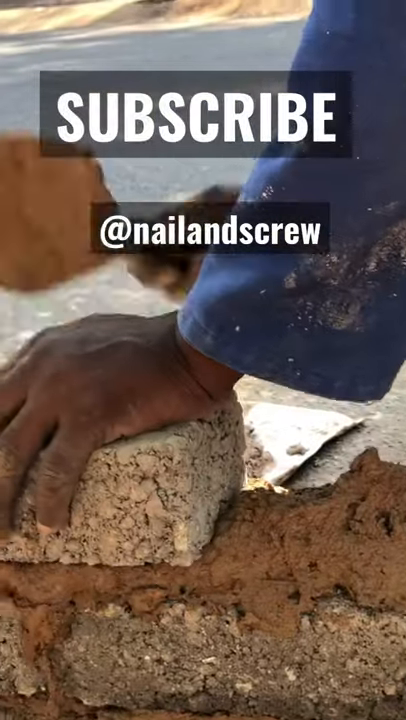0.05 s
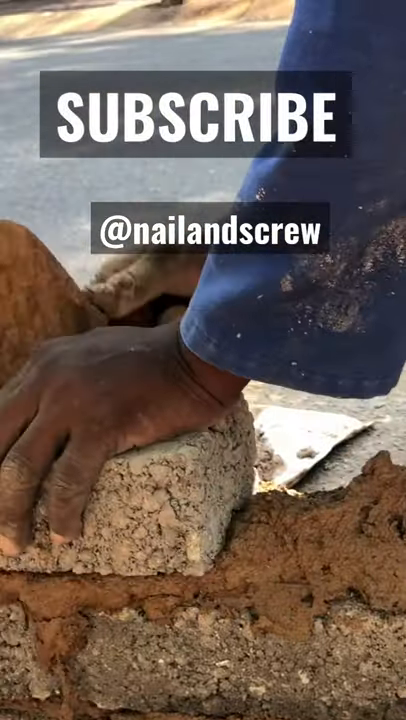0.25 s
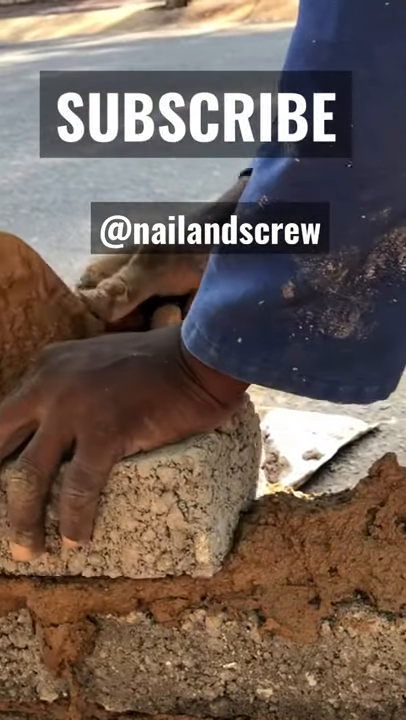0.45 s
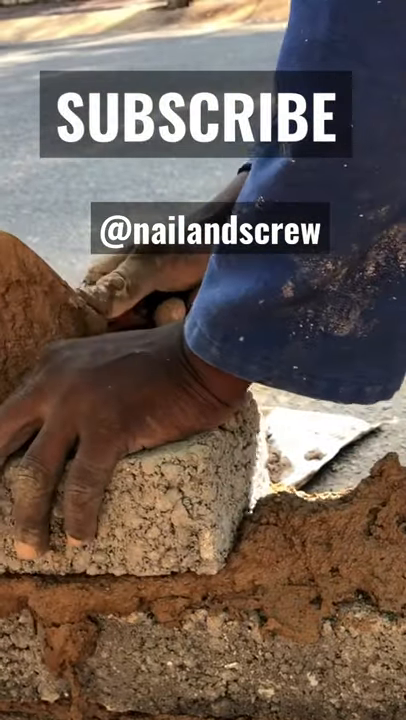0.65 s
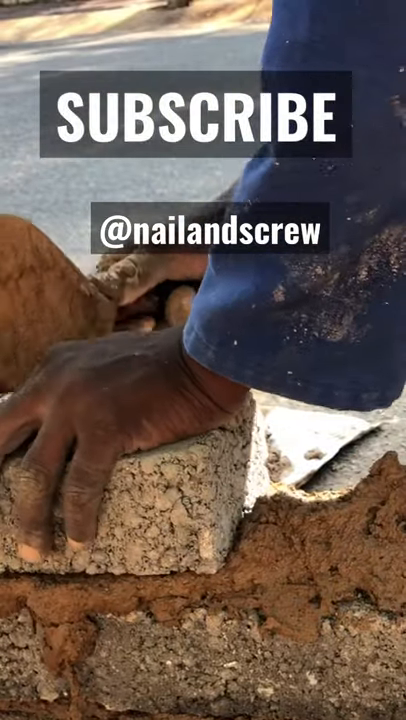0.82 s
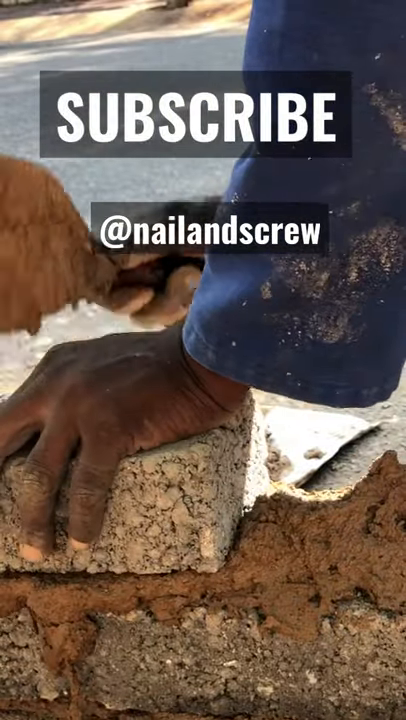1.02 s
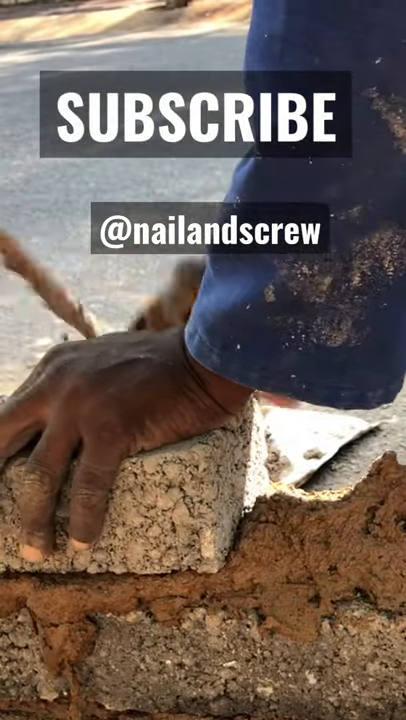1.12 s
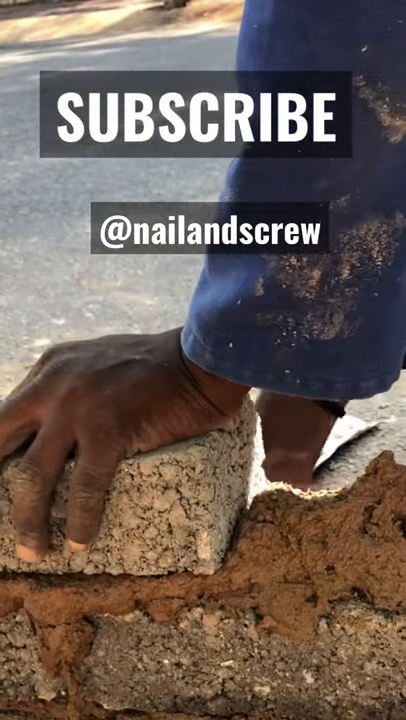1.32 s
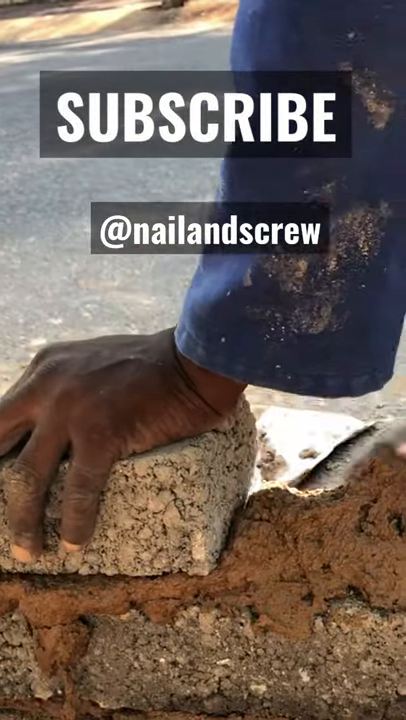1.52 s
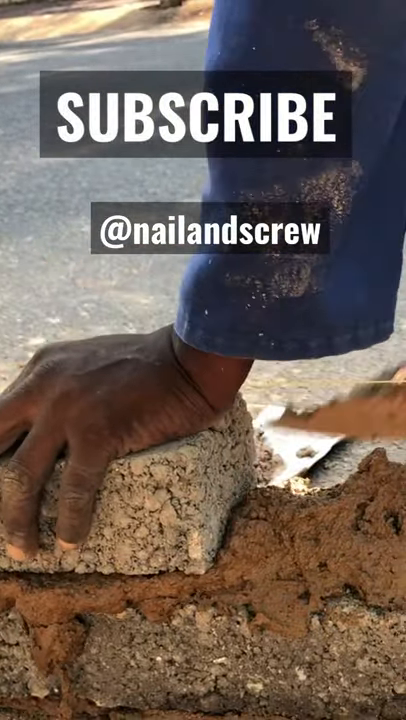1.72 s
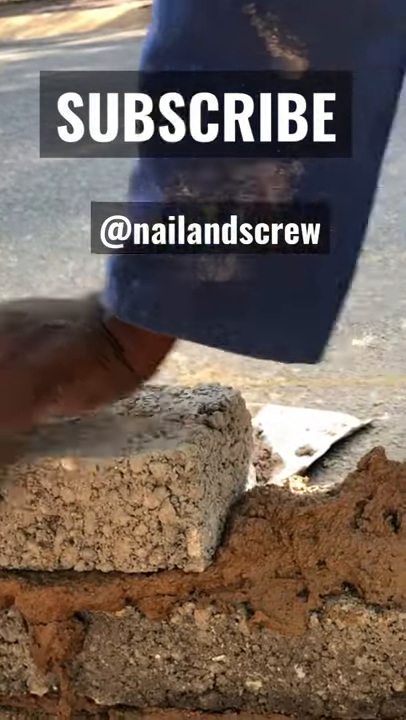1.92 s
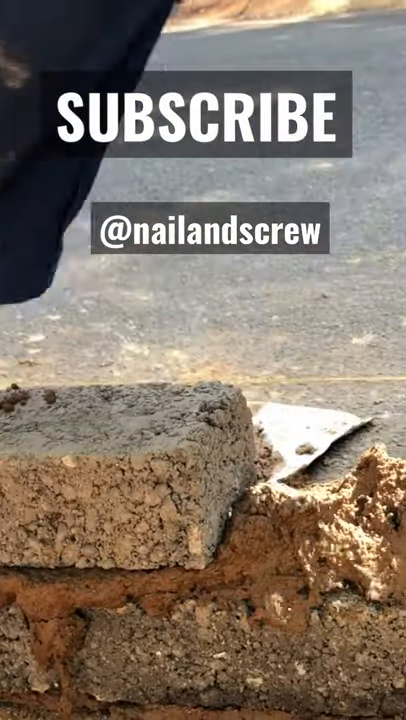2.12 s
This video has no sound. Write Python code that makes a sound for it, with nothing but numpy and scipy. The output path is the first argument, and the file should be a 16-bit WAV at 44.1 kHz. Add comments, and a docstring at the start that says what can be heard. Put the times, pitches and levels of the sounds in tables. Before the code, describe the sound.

Close by, a hand tool knocks a brick into mortar five times, each blow sharp and slightly gritty. A steel trowel then scrapes briefly over sandy ground, with quiet street air and a low distant hum behind.

```python
"""Outdoors, over quiet street air and a low hum, probably a distant engine, sand rustles faintly.
Close by, a mason knocks a brick into its mortar bed five times with a hand tool: each blow crushes
sand, sounds the damped brick, rings the tool and thuds through the wall.
Then steel lands on gritty ground and scrapes along it for a quarter of a second, the grit hissing
and ringing the blade. The hum, louder by now, carries on to the end."""
import sys
import numpy as np
from scipy import signal
from scipy.fft import rfft, irfft
from scipy.io import wavfile
from scipy.ndimage import uniform_filter1d, map_coordinates

SR = 44100
rng = np.random.default_rng(int(sys.argv[2]) if len(sys.argv) > 2 else 0)


def master(y):
    """Save y as 16-bit WAV."""
    cut = np.clip(np.atleast_2d(y).T, -1, 1)
    pcm = np.round(cut * 32767)  # scale
    wavfile.write(sys.argv[1], SR, pcm.astype(np.int16))


N = 94815
TIME = np.arange(N) / SR
HIT = np.arange(SR // 3) / SR  # time within a one-shot [s]

# Blows on the brick (time [s], level [dB], pitch [ratio], then trims: crunch [dB], thud [dB],
# tool ring [dB], brick mids [dB], brick treble [dB])
KNOCKS = [(0.2335, 0.5, 0.98, -1, -0.5, -5, -10, 2), (0.4348, 0.5, .97, 1, -1, 3, -6, 0),
          (0.632, -2, .99, -3, 3, -2, -8, -1.5), (0.7635, -8.5, 1.022, -3, -2.5, -2.5, 0, -0.5),
          (.9170, -3.5, 0.99, -1.5, -7, 1.5, -2, 0.5)]
# The tool touches the brick again (time [s], level [dB], pitch [ratio], crunch [dB], clink [dB])
REBOUNDS = [(0.246, -25.5, 1, 2, 0), (0.2561, -30.5, 0.89, 16.5, 21.5), (.4388, -18, 1.0, -8, -0.5),
            (.4745, -42.5, 1.5, 19, 16), (.7676, -14.5, 1.02, 7, -14), (.7715, -15, 1.02, -16, -10)]
# Heavily damped modes of the bedded brick (frequency [Hz], level [dB], t60 [s])
BRICK_MODES = [(362, -15, 0.029), (655, -7, 0.023), (969, -1.5, 0.017), (1055, -3, 0.015),
               (1266, -16, 0.0053), (1565, -24, 0.0105), (2063, -19, 0.029), (2388, -21, 0.023),
               (3620, -26.5, 0.028), (4930, -34, 0.013)]
# Longer ring of the tool (frequency [Hz], level [dB], t60 [s])
TOOL_MODES = [(460.5, -10, 0.14), (576, -12, 0.099), (806, -13, 0.11), (953, -24, 0.051),
              (1170, -1.5, 0.084), (1249, -0.5, 0.11), (1255, -18.5, 0.3), (1813, -9, 0.086),
              (1985, -35, 0.046), (2470, -11.5, 0.088), (3180, -26.5, 0.096), (3670, -30, 0.081),
              (4690, -43, .1)]
# Thud of the wall under the mortar bed (frequency [Hz], level [dB], t60 [s])
WALL_MODES = [(219.4, 3, 0.095), (333, -3.5, 0.063)]
# Low end of the brick sinking into the mortar (frequency [Hz], level [dB], t60 [s])
SINK_MODES = [(168, 3, 0.051)]
# Bright clink of a glancing touch (frequency [Hz], level [dB], t60 [s])
CLINK_MODES = [(3640, -26, .035), (4806, -23, 0.024), (7450, -30, 0.015)]
# Shudder of settling brick and mortar (frequency [Hz], level [dB])
SETTLE_SPECTRUM = [(60, -25), (150, 0), (260, 0), (450, -9), (1000, -1), (1500, -2), (2400, -11),
                   (3200, -28), (16000, -54.5)]
# Sand crushed under a blow (frequency [Hz], level [dB])
CRUNCH_SPECTRUM = [(300, -11.5), (1500, -6), (3000, 2), (5000, 1.5), (8000, -3.5), (12000, -4.5),
                   (16000, -8)]

# Envelopes of the scrape (time [s], blade rasp [dB], grit hiss [dB], low grind [dB])
STROKE = [(1.362, -66, -75, -60), (1.364, -33, -28, -40), (1.369, -30, -33, -30.5),
          (1.385, -42, -55, -33.5), (1.392, -26.5, -36, -29.5), (1.415, -30, -39, -62),
          (1.426, -40.5, -61, -38), (1.435, -35.5, -43.5, -33.5), (1.477, -38, -39, -43),
          (1.486, -27, -38, -41), (1.498, -32, -38, -39.5), (1.514, -27, -34, -44),
          (1.527, -36.5, -44.5, -42.5), (1.575, -45, -49.5, -48.5), (1.591, -44, -45.5, -53),
          (1.605, -62, -57, -64), (1.661, -67, -65.5, -60)]
# Resonances of the dragged blade (frequency [Hz], level [dB], t60 [s])
BLADE_MODES = [(810, -20, 0.027), (1106, -7.5, 0.017), (1149, 1.5, 0.041), (1214, -4, 0.027),
               (1490, -6.5, 0.016), (1830, -13, 0.032), (2140, -22, 0.013), (2400, -25, 0.026),
               (3350, -15, 0.028), (3710, -34, 0.014), (4760, -19.5, 0.02), (5040, -22, 0.025),
               (7680, -15.5, .02)]
# Bright hiss of grit (frequency [Hz], level [dB])
HISS_SPECTRUM = [(600, -31.5), (1800, 1.5), (2800, 0.5), (3600, 1), (5000, 3), (7000, -2), (10000, -3.5),
                 (15000, -5), (17000, -8)]
# Low grind under the blade (frequency [Hz], level [dB])
GRIND_SPECTRUM = [(50, -31), (110, 6.5), (220, -0.5), (330, -4.5), (650, -4), (1000, -7), (2500, -32)]
# The blade catches on stones (time [s], level [dB], pitch [ratio], click [dB])
CATCHES = [(1.364, -24.5, 1.09, -4.5), (1.3686, -28.5, 1.05, 5.5), (1.3888, -24, 0.97, -13),
           (1.4132, -33.5, 0.93, 1), (1.4337, -31, .95, -2), (1.458, -44, 1.1, 8), (1.4835, -25, .98, 3),
           (1.4859, -22.5, 1.0, -16), (1.5123, -32, 0.986, -6), (1.5162, -27.5, 1.05, 1),
           (1.5528, -41, 0.84, 17), (1.5902, -35.5, 1.02, -4), (1.602, -54, 1.07, 13)]

# Ticks of loose sand (time [s], level [dB])
TICKS = [(.0722, -43), (.105, -44.5), (0.2886, -49), (.3745, -44), (.578, -50.5), (.675, -45), (.719, -52),
         (.8335, -53.5), (.996, -54.5), (1.269, -56), (1.788, -49)]
# The hand rubs faintly on the brick (time [s], level [dB], half-width [s])
RUBS = [(0.361, -73.5, 0.0066), (1.093, -66.5, 0.029), (1.203, -74, .04), (1.783, -59, 0.015)]
# Resonances of the faint rustle (frequency [Hz], level [dB], t60 [s])
RUSTLE_MODES = [(2530, -4, 0.018), (3190, -4.5, .016), (4200, -2, .01), (4610, -5.5, 0.0121),
                (9000, -10, .001)]
# The rustle fading away (time [s], level [dB])
RUSTLE_LEVEL = [(0, -54.5), (.16, -63.5), (.3, -69), (.9, -76.5), (2.15, -89)]

# Swells of the distant hum (time [s], level [dB])
HUM_LEVEL = [(0, -61), (.05, -49.5), (.35, -55), (.39, -56.5), (.6, -51.5), (.95, -47), (1.02, -62),
             (1.18, -45), (1.24, -57.5), (1.29, -38.5), (1.44, -36.5), (1.54, -49.5), (1.75, -40.5),
             (1.9, -39), (2.11, -39), (2.15, -38)]
# Soft low bumps (time [s], level [dB], frequency [Hz])
BUMPS = [(0.107, -46, 83), (.495, -37.5, 73), (.54, -44, 60), (.72, -47, 62), (1.209, -45, 72),
         (1.3, -33, 68), (1.733, -35, 68.9), (2.11, -42.5, 63)]
# Street air (frequency [Hz], level [dB])
AIR_SPECTRUM = [(20, -21.5), (60, -2), (160, -1.5), (260, -10), (500, -14), (1100, -20), (2200, -31),
                (5000, -33), (10000, -37), (16000, -37)]
# Slaps off the ground and the wall (delay [s], gain [ratio])
ECHOES = [(.0032, 0.079), (.0071, 0.18), (0.0133, .05)]
# Decay of the scatter from the surroundings (frequency [Hz], t60 [s])
SCATTER_DECAY = [(100, 0.087), (500, .07), (1300, 0.061), (4000, 0.069), (16000, 0.072)]


def knocks():
    """Each blow crushes sand, sounds the brick, rings the tool and thuds the wall; some rebound."""
    out = np.zeros(N)
    contact_s, crunch_lead_s = 0.00077, 0.0008
    mids_hz, treble_hz = 1150, 1750
    attack = 1 - np.exp(-(HIT / contact_s) ** 2)
    thud = (ring(WALL_MODES) - ring(SINK_MODES)) * (1 - np.exp(-HIT / 0.0017))
    settling = amp(-22.5) * np.minimum(HIT / 0.0087, 1) * fade(HIT, t60=0.06)
    for s, db, pitch, crunch_db, thud_db, ring_db, mids_db, treble_db in KNOCKS:
        modes = [(hz, mode_db + (treble_db if hz > treble_hz else mids_db * (hz > mids_hz)), t60)
                 for hz, mode_db, t60 in BRICK_MODES]
        tool = amp(ring_db - 24.5) * ring(TOOL_MODES)
        blow = attack * (ring(modes, pitch) + tool) + amp(thud_db - 24) * thud
        shudder = settling * noise(SETTLE_SPECTRUM)
        add(out, s, amp(db) * (blow + shudder))
        add(out, s - crunch_lead_s, amp(db + crunch_db) * crunch())
    for s, db, pitch, crunch_db, clink_db in REBOUNDS:
        touch = ring(BRICK_MODES, pitch) + amp(clink_db) * ring(CLINK_MODES)
        add(out, s, amp(db) * attack * touch)
        add(out, s - crunch_lead_s, amp(db + crunch_db) * crunch())
    return out


def crunch():
    """Crushed sand: a sharp crack and a short tail of crumbs."""
    attack = np.minimum(HIT / 0.00084, 1)
    crack = amp(-19.5) * fade(HIT, t60=0.014)
    crumbs = amp(-41.5) * fade(HIT, t60=0.1)
    return attack * (crack + crumbs) * noise(CRUNCH_SPECTRUM)


def scrape(judder_db=2, sag_per_s=0.26, chip_share=0.59):
    """Grit hisses, grinds and rings the juddering blade, which sags in pitch and catches on stones."""
    start, end = STROKE[0][0], STROKE[-1][0]
    judder = amp(judder_db * drift(size=130))
    grit = grains() * judder
    pitch = 1.03 - sag_per_s * np.clip(TIME - start, 0, end - start) + 0.035 * drift(size=150)
    hiss = colour((1 - chip_share) * unit(grit) + chip_share * unit(chips()), HISS_SPECTRUM)
    blade = signal.fftconvolve(grit, ring(BLADE_MODES))
    rasp = unit(map_coordinates(blade, [np.cumsum(pitch)], order=3))  # varispeed bends the pitch
    grind = colour(grains() * judder, GRIND_SPECTRUM)
    out = rasp * level(STROKE, 1) + hiss * level(STROKE, 2) + grind * level(STROKE, 3)
    out *= (TIME > start) & (TIME < end)
    for s, db, bend, click_db in CATCHES:
        add(out, s, amp(db) * (ring(BLADE_MODES, bend) + amp(click_db) * tick(t60=0.0067)))
    return out


def grains(per_s=3000, spread_db=3):
    """Clicks of sand grains of uneven size."""
    sizes = amp(spread_db * np.minimum(rng.exponential(1, N), 4))
    return sizes * rng.choice([-1, 1], N) * (rng.random(N) < per_s / SR)


def chips(count=24):
    """Grit of many sizes, each size snapping at a pitch of its own."""
    clicks, size = grains(), rng.integers(0, count, N)
    t = HIT[:len(HIT) // 10]
    pitches_hz = np.linspace(1700, 14500, count) * rng.uniform(0.95, 1.04, count)
    snaps = [fade(t, t60=0.011) * np.sin(2 * np.pi * hz * t) for hz in pitches_hz]
    return sum(signal.oaconvolve(clicks * (size == k), snap)[:N] for k, snap in enumerate(snaps))


def tick(t60):
    """One grain snapping."""
    return noise(HISS_SPECTRUM) * fade(HIT, t60)


def sand():
    """Loose grains tick and rub under the hand, over a faint rustle."""
    rustle = signal.fftconvolve(grains(), ring(RUSTLE_MODES))[:N]
    out = unit(rustle) * level(RUSTLE_LEVEL)
    for s, db in TICKS:
        add(out, s, amp(db) * tick(t60=0.01))
    for s, db, width_s in RUBS:
        out += amp(db) * swell(s, width_s) * colour(grains(), HISS_SPECTRUM)
    return out


def street(air_db=-52, hum_hz=106.7):
    """The background bed: gently breathing air, a wavering distant hum and a few low bumps."""
    air = amp(air_db + drift(size=3000)) * noise(AIR_SPECTRUM, N)
    cycles = np.cumsum(hum_hz + 0.43 * drift(size=4000)) / SR
    hum = level(HUM_LEVEL) * np.sqrt(2) * np.sin(2 * np.pi * cycles)
    bumps = sum(amp(db) * swell(s, width_s=0.014) * np.cos(2 * np.pi * hz * (TIME - s))
                for s, db, hz in BUMPS)
    return air + hum + bumps


def outdoors(x, scatter_db=-17, far_db=-35):
    """The surroundings add a quick scatter, a faint dark tail and near slaps."""
    count = SR // 2
    t = np.arange(count) / SR
    hz, frame_s, bands = signal.stft(rng.standard_normal(count), SR, nperseg=256)
    bands *= fade(frame_s, read(SCATTER_DECAY, hz)[:, None])
    scatter = signal.istft(bands, SR, nperseg=256)[1][:count] * np.minimum(t / 0.0031, 1)
    far = signal.lfilter(*signal.butter(1, 2000, fs=SR), rng.standard_normal(count)) * fade(t, t60=0.34)
    response = (amp(scatter_db) * unit(scatter) + amp(far_db) * unit(far)) / np.sqrt(count)
    out = x + signal.fftconvolve(x, response)[:N]
    for delay, gain in ECHOES:
        add(out, delay, gain * x)
    return out


def ring(modes, pitch=1):
    """Struck modes dying away."""
    return sum(amp(db) * fade(HIT, t60) * np.sin(2 * np.pi * hz * pitch * HIT) for hz, db, t60 in modes)


def noise(spectrum, count=len(HIT)):
    """Coloured noise at rms 1."""
    return colour(rng.standard_normal(count), spectrum)


def colour(x, spectrum):
    """EQs x with a spectrum, at rms 1."""
    gain = amp(read(spectrum, np.fft.rfftfreq(len(x), 1 / SR)))
    return unit(irfft(rfft(x) * gain, len(x)))


def read(points, hz):
    """Reads a table on a log-frequency axis."""
    f, value = np.transpose(points)
    return np.interp(np.log(hz + 1), np.log(f), value)


def level(table, column=1):
    """Gain envelope from one dB column of a table."""
    rows = np.array(table)
    return amp(np.interp(TIME, rows[:, 0], rows[:, column]))


def fade(t, t60):
    """Falls 60 dB in t60 seconds."""
    return np.exp(-np.log(1000) * t / t60)


def swell(s, width_s):
    """Bell-shaped envelope peaking at s seconds."""
    return np.exp(-((TIME - s) / width_s) ** 2)


def drift(size):
    """Random modulation at rms 1, smoothed over size samples."""
    return unit(uniform_filter1d(uniform_filter1d(rng.standard_normal(N), size), size))


def amp(db):
    """Decibels to gain."""
    return 10 ** (np.asarray(db) / 20)


def unit(x):
    """Scales to rms 1."""
    return x / np.sqrt(np.mean(x ** 2) + 1e-20)


def add(mix, s, sound):
    """Mixes a sound in at s seconds."""
    part = mix[max(round(s * SR), 0):][:len(sound)]
    part += sound[:len(part)]


def scene():
    """The mason's work up front, over the street bed, in mono."""
    return (outdoors(knocks() + scrape() + sand()) + street())[None]


def record(dry):
    """A steep high cut on the whole mix."""
    high_cut = signal.firwin(301, 16200, window=("kaiser", 9), fs=SR)
    return signal.oaconvolve(dry, high_cut[None], "same")


dry = scene()
out = record(dry)
master(out)
```